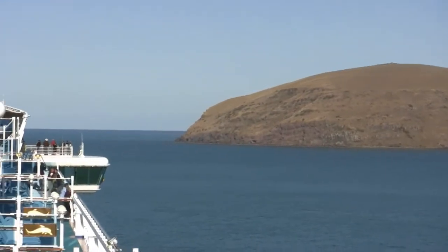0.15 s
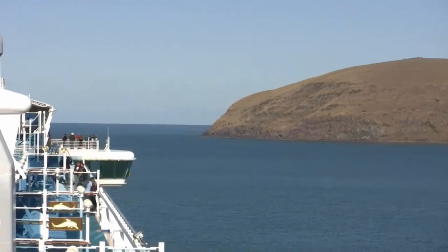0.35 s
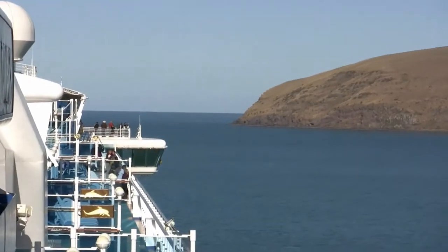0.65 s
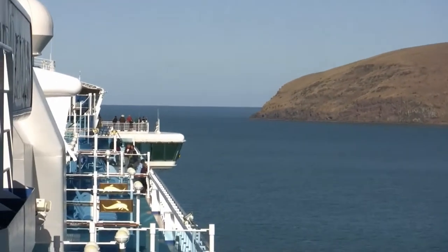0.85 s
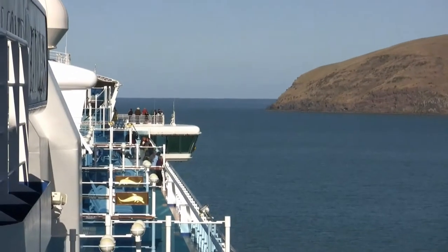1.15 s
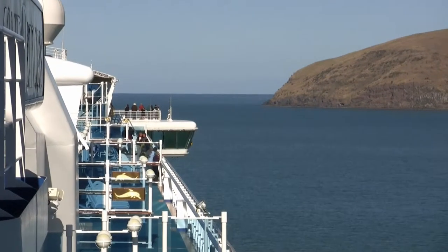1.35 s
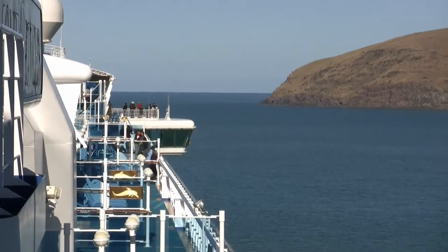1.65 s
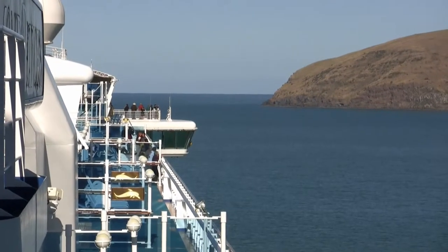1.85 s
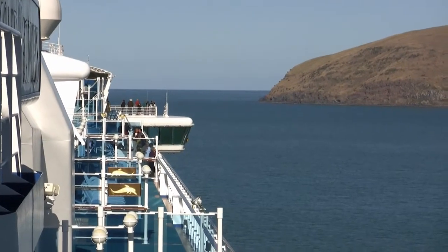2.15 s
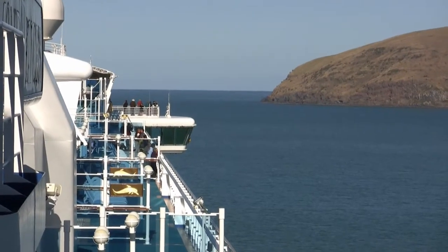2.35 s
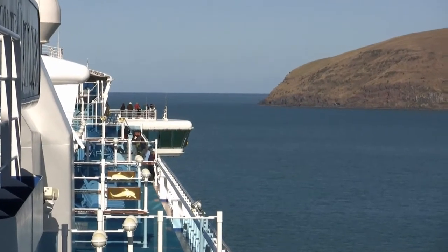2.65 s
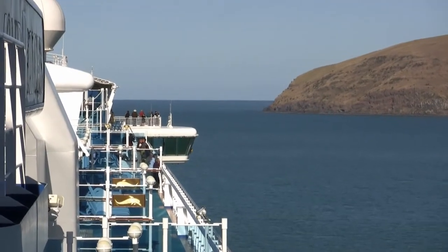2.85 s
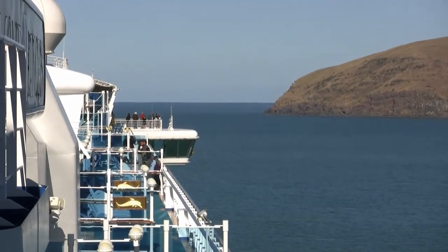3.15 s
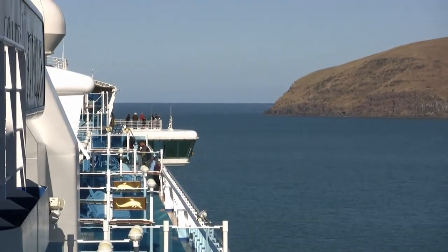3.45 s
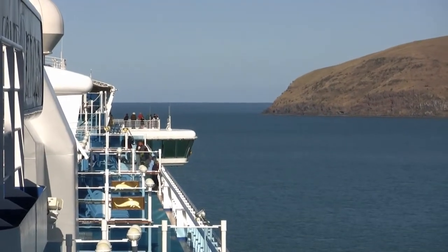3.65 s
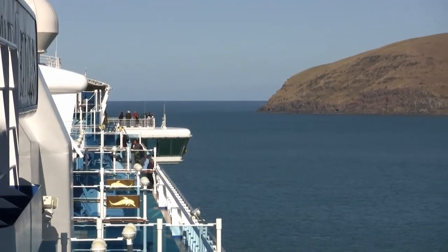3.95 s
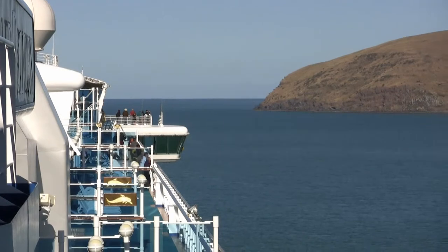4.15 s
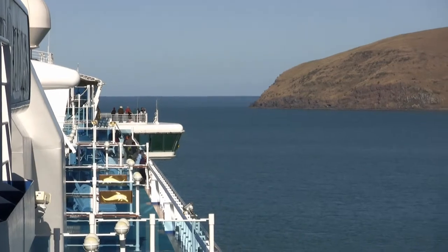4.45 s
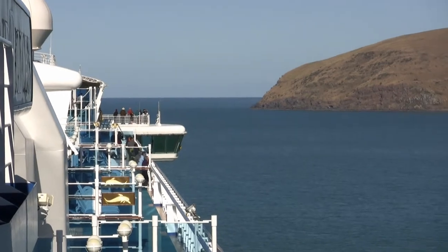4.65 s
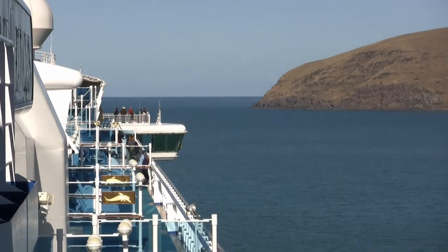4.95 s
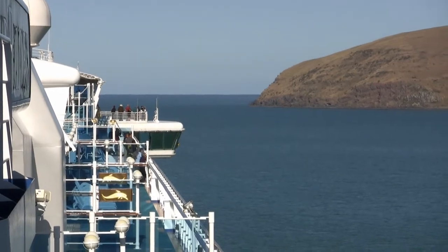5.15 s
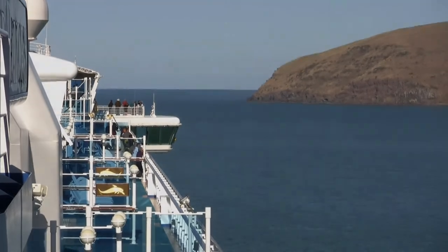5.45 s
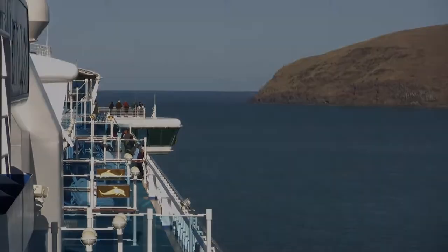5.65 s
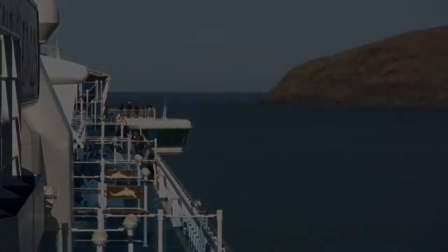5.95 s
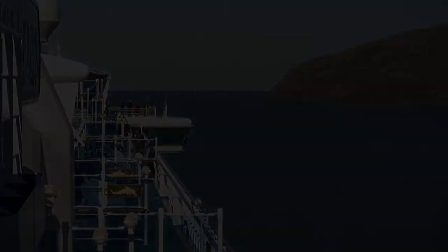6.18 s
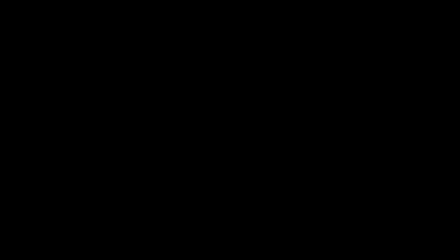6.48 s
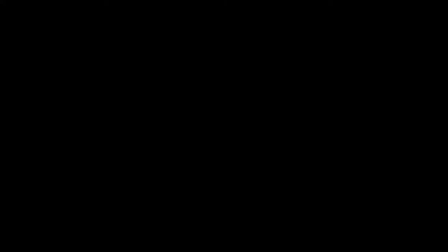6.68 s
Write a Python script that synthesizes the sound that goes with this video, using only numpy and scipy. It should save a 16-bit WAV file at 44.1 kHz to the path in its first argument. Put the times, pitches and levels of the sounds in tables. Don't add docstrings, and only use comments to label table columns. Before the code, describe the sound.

From 0 s a dense, steady ship drone is already present, heard from the high open deck of a large vessel under way. Slow diesels throb deep in the funnel, a low fluttering rumble beneath a roar of air in ducts. Two ventilation fans hold clear hums, one low and stronger, one nearly an octave higher, with faint thin whines above. Far below, bow wave and foam blend into a soft midrange hiss without separate splashes. Between about 2.3 and 3.4 s the machinery pitch rises almost imperceptibly, then keeps creeping up. Levels waver gently, with no distinct events. The small stereo camcorder makes the bass wide and swaying, the treble dull with scattered, watery compression specks. From about 5.3 s everything fades smoothly, a few decibels lower by 6.3 s and still audible at the end, around 6.8 s.

```python
import sys
import numpy as np
from scipy import signal
from scipy.fft import rfft, irfft, next_fast_len
from scipy.io import wavfile
from scipy.ndimage import uniform_filter1d

SR = 44100
rng = np.random.default_rng(int(sys.argv[2]) if len(sys.argv) > 2 else 0)


def gain_from_db(level_db):
    decades = np.asarray(level_db, float) / 20
    return 10 ** decades


def wav_record(signal):
    frames = np.transpose(np.atleast_2d(signal))
    bounded = np.clip(frames, -1, 1)
    quanta = np.round(bounded * 32767).astype(np.int16)
    wavfile.write(sys.argv[1], SR, quanta)


N = 300747
SIZE = next_fast_len(N)
SECONDS = np.arange(N) / SR
BINS_HZ = np.fft.rfftfreq(SIZE, 1 / SR)


def shape(table, hz=BINS_HZ):
    points, db = np.transpose(table)
    return gain_from_db(np.interp(np.log(hz + 1), np.log(points), db))


def walk(rate):
    hold = int(SR / rate)
    levels = np.repeat(rng.standard_normal(N // hold + 1), hold)
    smooth = uniform_filter1d(uniform_filter1d(levels, hold), hold)
    return 1.374 * smooth[:N]


def tone(hz, db):
    turns = np.cumsum(hz) / SR + rng.random()
    return np.sqrt(2) * gain_from_db(db) * np.sin(2 * np.pi * turns)


def diesel(speed):
    exhaust = {5: -64, 6: -62.5, 7: -52.5, 8: -44, 9: -47, 10: -38.4, 11: -54, 13: -50.5, 16: -52}
    cycle_hz = 4.277
    return sum(tone(k * cycle_hz * speed, db + 1.4 * walk(1.7)) for k, db in exhaust.items())


def fans(speed):
    big = tone(149.39 * speed, -31.5 + 0.53 * walk(2.5))
    small = tone(267.07 * speed, -35.5 + 0.73 * walk(2.5))
    return big + small


def whistles(speed):
    # pitch in Hz, wander in Hz, level in dB rms.
    whines = [(298.2, .6, -51), (398.3, .3, -55), (520.8, .3, -57), (1190.3, .8, -66), (1903.6, .8, -63.5)]
    total = 0
    for hz, wander_hz, db in whines:
        pitch = hz * speed + wander_hz * walk(3.12)
        total = total + tone(pitch, db + 1.1 * walk(3.5))
    return total


def moving_air(colour, flicker_db, rate):
    # frequency in Hz, level in dB relative to the shared sound.
    diffuse = [(30, -15), (80, -15), (120, -22), (350, -19), (1000, -14), (2500, -7), (5000, -3),
               (9000, -.5)]
    octave = np.log2(BINS_HZ + 1)
    noise = rfft(rng.standard_normal((2, SIZE))) * np.sqrt(SR / 2) * shape(colour)
    noise[1] *= shape(diffuse)
    total = 0
    for centre in range(3, 16):
        band = np.cos(np.pi / 2 * np.clip(octave - centre, -1, 1)) ** 2
        total = total + irfft(noise * band, SIZE)[:, :N] * gain_from_db(flicker_db * walk(rate))
    return total


def duct_air():
    # frequency in Hz, level in dB per Hz.
    roar = [(12, -81.5), (24, -70), (36, -58.5), (58, -55.5), (72, -52), (82, -65), (100, -52),
            (125, -49.5), (140, -55), (240, -56.5), (310, -59), (400, -56.5), (520, -63), (3000, -130)]
    return gain_from_db(-0.5) * moving_air(roar, flicker_db=0.3, rate=6)


def sea_wash():
    # frequency in Hz, level in dB per Hz.
    foam = [(200, -71), (450, -64), (640, -60.5), (760, -65), (1000, -68.5), (1400, -73), (1880, -77),
            (1950, -78.5), (2600, -85), (3500, -90.5), (5000, -96), (7000, -103), (9500, -107),
            (16000, -120)]
    return gain_from_db(-0.5) * moving_air(foam, flicker_db=0.46, rate=9)


def fade_db(seconds):
    return -4 * np.maximum(seconds - 5.34, 0) ** 1.4


def scattered_treble(x):
    # frequency in Hz, step in dB.
    coarse = [(500, -56), (4000, -61), (7000, -56), (10000, -52), (15000, -52.5)]
    frame, first_start, top_hz = 1024, 640, 15600
    frame_swing_db, band_swing_db = 4.6, 2.6
    n, k = np.arange(2 * frame) + 0.5, np.arange(frame) + 0.5
    basis = np.cos(np.pi / frame * np.outer(n + frame / 2, k)) * np.sqrt(2 / frame)
    basis *= np.sin(np.pi * n / (2 * frame))[:, None]
    lead, count = 2 * frame - first_start, N // frame + 4
    padded = np.pad(x, ((0, 0), (lead, count * frame - N - lead)))
    blocks = padded.reshape(2, count, frame)
    lines = np.concatenate([blocks[:, :-1], blocks[:, 1:]], axis=2) @ basis

    chance = rng.standard_normal(count)
    frame_db = frame_swing_db * np.clip(chance[1:] + 0.3 * chance[:-1], -1.3, 2.3)
    frame_db += 0.55 * fade_db(np.arange(count - 1) * frame / SR)
    band_db = band_swing_db * np.repeat(rng.standard_normal((count - 1, 128)), 8, axis=1)
    hz = k * SR / (2 * frame)
    step = shape(coarse, hz=hz) * gain_from_db(frame_db[:, None] + band_db)

    rounded = np.sign(lines) * np.floor(np.abs(lines) / step + 0.4) * step
    back = (rounded * (hz < top_hz)) @ basis.T
    joined = back[:, 1:, :frame] + back[:, :-1, frame:]
    return joined.reshape(2, -1)[:, lead - frame:lead - frame + N]


def scene():
    # time in seconds, speed off normal in per mille.
    speed_rise = [
        (0, -1.1),
        (2.3, -1.1),
        (3.4, .6),
        (6.82, 1.1),
    ]
    times, per_mille = np.transpose(speed_rise)
    speed = 1 + np.interp(SECONDS, times, per_mille) / 1000
    sound = duct_air() + sea_wash()
    sound[0] += diesel(speed) + fans(speed) + whistles(speed)
    return sound * gain_from_db(fade_db(SECONDS))


def low_pass(x):
    return signal.sosfilt(signal.butter(12, 21000, fs=SR, output="sos"), x)


def record(dry):
    mismatch = -1 / (0.5 + 1j * BINS_HZ / 57) - 0.04
    hole_lag = 1j * 0.18 * np.sin(np.pi / 2 * np.minimum(BINS_HZ / 3600, 2))
    side = irfft(rfft(dry[0], SIZE) * (mismatch + hole_lag), SIZE)[:N] + dry[1]
    pair = np.array([dry[0] + side, dry[0] - side])
    hiss = gain_from_db(-105) * rng.standard_normal((2, N))
    return low_pass(scattered_treble(pair) + hiss)


dry = scene()
out = record(dry)
wav_record(out)
```